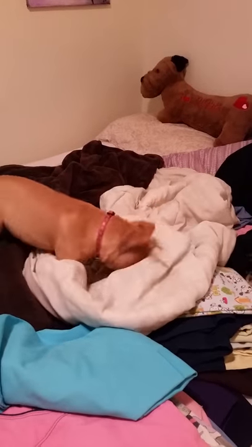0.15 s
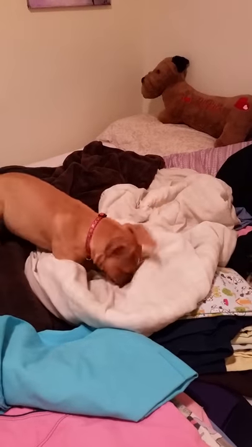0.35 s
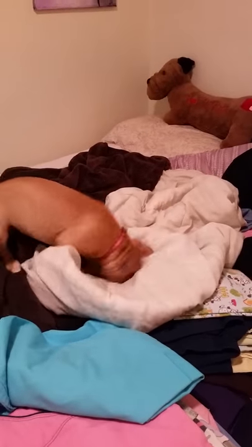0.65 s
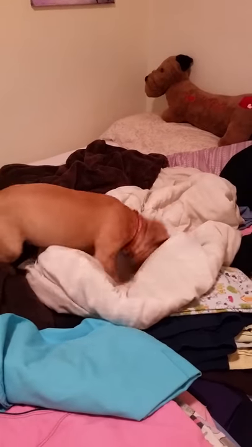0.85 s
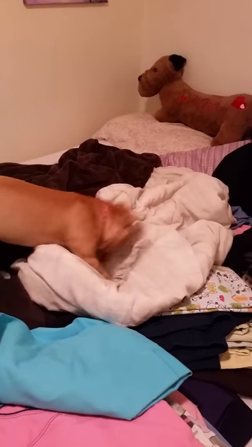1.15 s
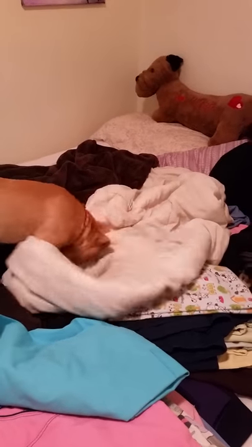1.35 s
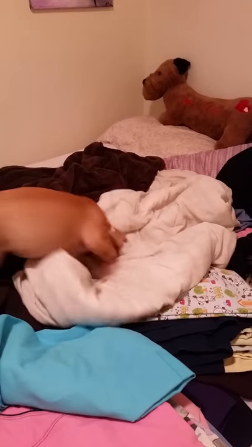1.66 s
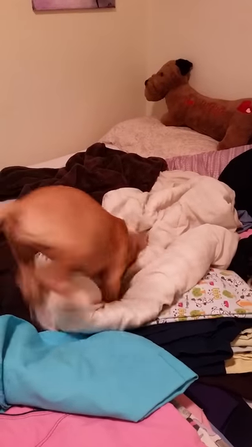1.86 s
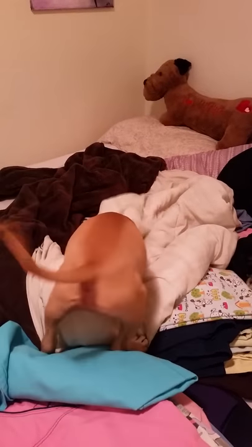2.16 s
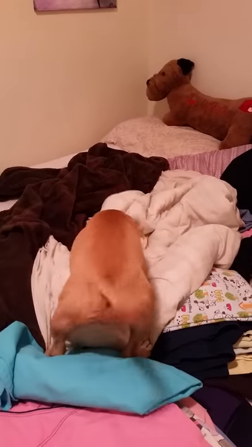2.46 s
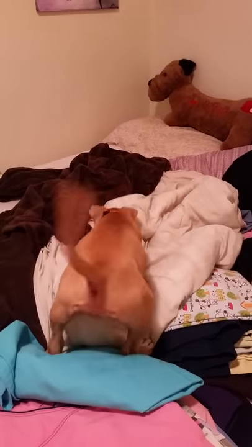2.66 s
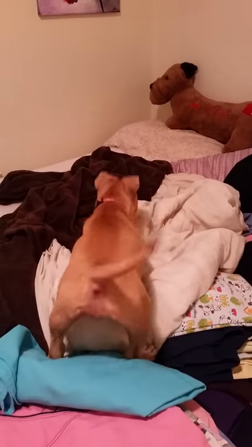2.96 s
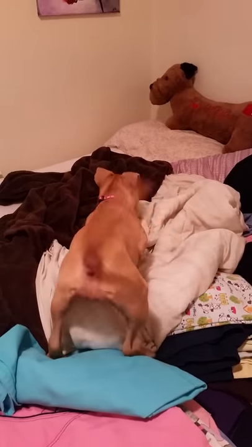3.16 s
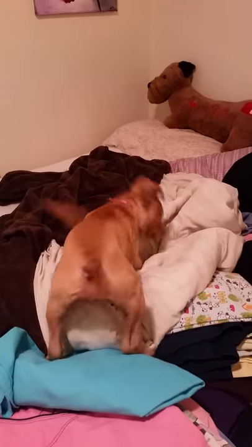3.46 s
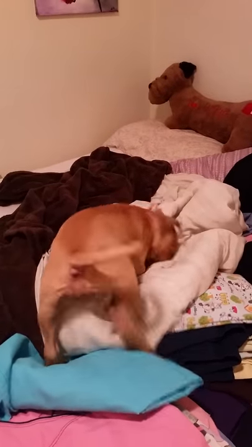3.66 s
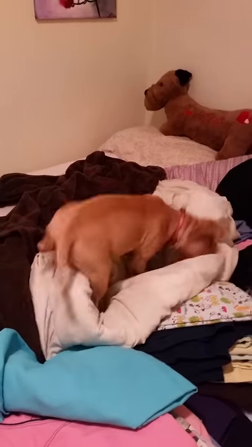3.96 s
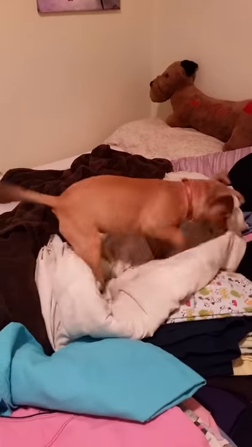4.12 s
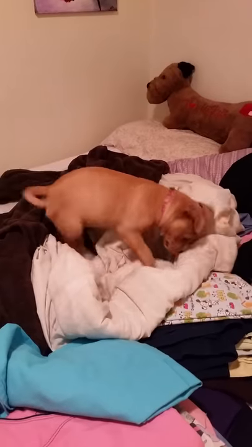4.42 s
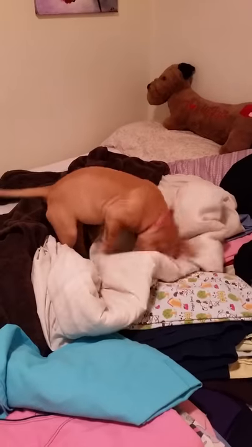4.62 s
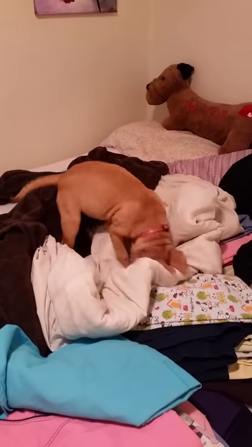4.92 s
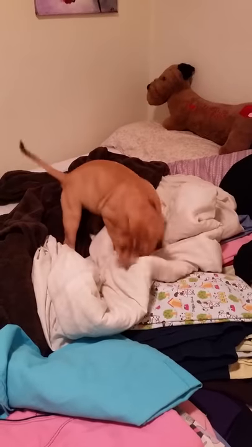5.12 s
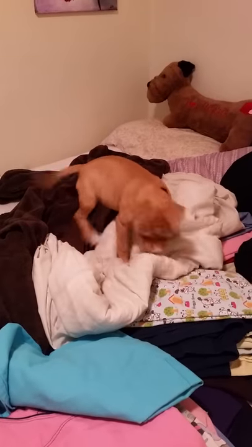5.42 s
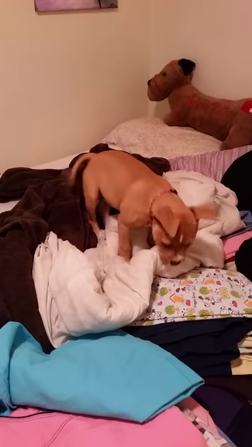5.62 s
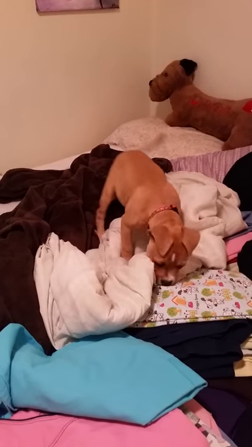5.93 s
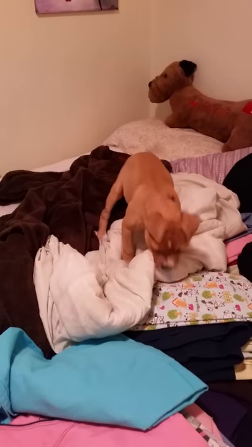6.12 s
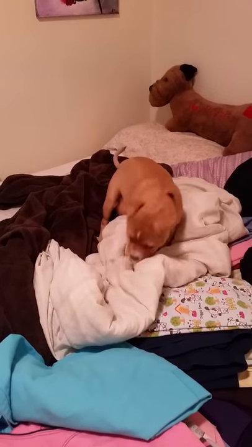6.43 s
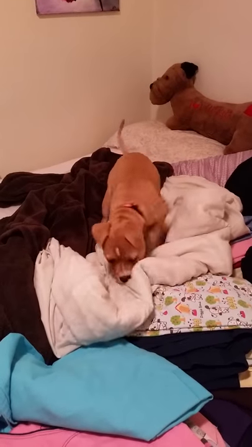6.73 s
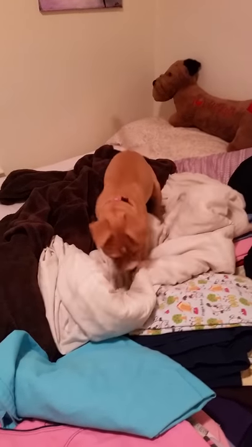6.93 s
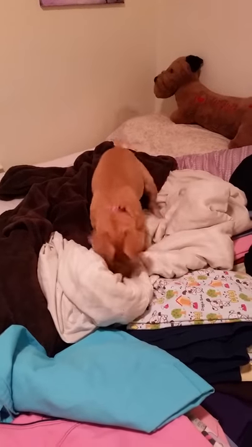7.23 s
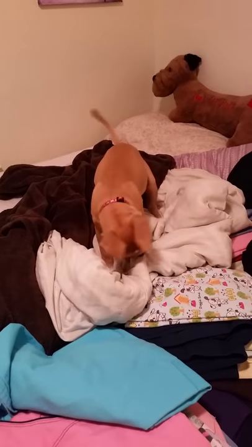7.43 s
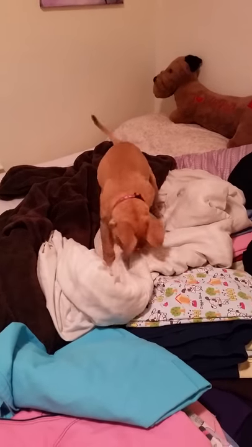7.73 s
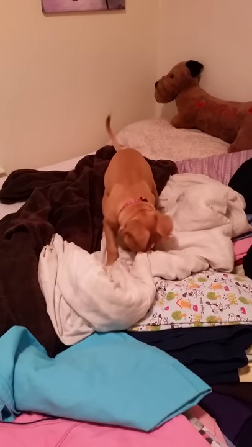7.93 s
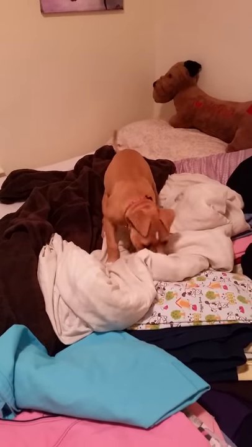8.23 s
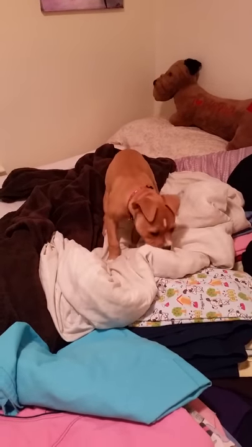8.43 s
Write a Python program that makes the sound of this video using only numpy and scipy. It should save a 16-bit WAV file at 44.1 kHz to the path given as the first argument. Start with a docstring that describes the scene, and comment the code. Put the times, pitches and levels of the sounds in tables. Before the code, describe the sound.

Soft dull cloth rustling and paw thuds on bedding, sparse metallic tag clinks and sharp clicks, over a steady low mains hum.

```python
"""Small bedroom: a small dog paws and noses its way into a heap of blankets on a bed.
Fabric swishes and folds (shaped noise, dying swings), paws pad on the mattress (swelling low sines).
Metal tags on the collar clink (struck decaying modes); claws tick and scratch (noise bursts).
Mains hum and a few low pops sit mostly in the left microphone, over room noise, hiss and a faint drone."""
import sys
import numpy as np
from scipy import signal
from scipy.fft import rfft, irfft, next_fast_len
from scipy.io import wavfile

SR = 44100
rng = np.random.default_rng(int(sys.argv[2]) if len(sys.argv) > 2 else 0)


def materialize(psi):
    """Save the field psi as 16-bit PCM at rate SR to the path in sys.argv[1].

    A 1-D psi becomes a single channel; in a 2-D psi each row is a channel.
    """
    bounded = np.clip(np.atleast_2d(psi).T, -1, 1)
    quanta = np.round(bounded * 32767).astype(np.int16)
    wavfile.write(sys.argv[1], SR, quanta)


N = 378359
TIME_S = np.arange(N) / SR

# coat brushing on the covers: time_s, level_db
BRUSHING = [(0, -68.5), (1.6, -68), (2.5, -67), (3.7, -68.5), (4.5, -67), (5.2, -68), (5.8, -67.5),
            (6.7, -73), (7.3, -67), (8, -73.5), (8.58, -74)]
# dull rustle of the heap, as effort: time_s, level_db
EFFORT = [(0, -48.5), (1.55, -47.5), (2, -53), (4.7, -54), (5.3, -58), (7.2, -63), (8.58, -86)]
# spectra of brushing and heap: freq_hz, gain_db
BRUSH_SPECTRUM = [(300, 0.5), (1200, 14.5), (2500, 7.5), (4500, 3), (7000, -6.5), (11000, -6.5),
                  (15000, -2.5)]
HEAP_SPECTRUM = [(30, 11), (80, 6), (150, 16), (330, 0), (450, -0.5), (750, -8), (1300, -17), (3000, -29.5),
                 (9000, -51)]

# spectra of room noise and microphone hiss: freq_hz, gain_db
ROOM_SPECTRUM = [(20, -2), (45, 4.5), (100, 0.5), (150, 0.5), (260, -6.5), (335, -7), (430, -13),
                 (900, -18), (1800, -30.5), (4500, -41.5), (14000, -82)]
HISS_SPECTRUM = [(300, 12.5), (2500, 2), (5000, -3.5), (7500, 4), (11000, -24), (15000, -15)]
ROOM_NOISE_DB, HISS_DB = -50.0, -73.5
DRONE_HZ, DRONE_DB, DRONE_T60_S = 328.4, -64, 0.24

# mains hum partials: multiple, level_db
HUM_PARTIALS = [(1, 1.5), (2, -17), (3, -8.5), (5, -22.5), (9, -35), (11, -50.5)]
MAINS_HZ = 60
HUM_DB, HUM_WAVER_DB = -30, 0.47
HUM_DROP_DB, HUM_DROP_S, HUM_DROP_WIDTH_S = 6, 4.24, 0.0089
HUM_DIP_DB, HUM_DIP_S, HUM_DIP_WIDTH_S = 2, 0.74, 0.088
LEFT_MIC_DB = [[-1], [-31]]  # left, right gain of hum and pops

# collar knocks: start_s, small_tag_db, large_tag_db, ring_db, clasp_db
KNOCKS = [(.029, -71, -55, -48.5, -66), (0.054, -66, -54, -56, -70), (0.091, -63, -62, -61, -80),
          (1.289, -66, -78, -82, -80), (1.382, -64.5, -76, -82, -80), (1.661, -68, -78, -72, -78),
          (1.723, -65, -61, -58, -53), (1.753, -69, -66, -51.5, -46.5), (1.811, -78, -65, -61, -75),
          (1.83, -51, -40, -44, -60), (1.845, -61, -46, -67, -70), (1.918, -63, -70, -70, -72),
          (2.164, -74, -63, -80, -72), (2.177, -74, -61.5, -78, -66), (2.226, -67, -63.5, -80, -72),
          (3.135, -75, -57.5, -55, -74), (3.597, -69, -42.5, -54, -62), (3.629, -67, -57, -64, -62),
          (3.703, -77, -73, -74, -76), (3.8, -65, -72, -70, -82), (3.848, -69, -79, -76, -78),
          (3.865, -67, -56, -48, -66), (3.88, -72, -65, -50.5, -74), (3.964, -68, -61, -68, -80),
          (4.645, -72, -65, -61, -80), (4.689, -75, -61, -68, -78), (4.98, -50, -58, -53, -72),
          (5.042, -59, -72, -66, -78), (5.117, -64, -80, -70, -80), (5.187, -55, -66, -59, -65),
          (5.243, -61, -63, -69, -71), (5.493, -59, -61, -47, -63), (5.784, -78, -65, -74, -80),
          (5.89, -80, -63.5, -62, -80), (5.989, -72, -74, -66, -76), (6.036, -68, -45.5, -55, -56),
          (6.093, -60, -60, -75, -72), (6.488, -68, -76, -84, -84), (6.504, -73, -78, -84, -84),
          (7.106, -62, -71, -66, -75), (7.128, -64, -69, -72, -78), (7.188, -71, -76, -80, -82),
          (7.377, -69, -72.5, -77, -77), (7.587, -62, -73, -73, -80)]
# modes of each metal part: pitch_hz, level_db, t60_s
SMALL_TAG = [(6170, -17, .1), (6965, -6.5, .12), (9925, -6.5, .13)]
LARGE_TAG = [(4360, -23, .09), (4680, -23, .08), (7010, -12.5, .13), (10185, -8, .12)]
RING = [(4400, -21, .08), (6990, -5.5, .13), (12930, -10.5, .07), (13030, -11, .07)]
CLASP = [(13760, -4, .08)]
CONTACT_DB, CONTACT_DECAY_S = -13.5, 0.016  # metal chatter, re hardest-hit part
REBOUND_S, REBOUND_DB = 0.012, -11  # mean wait; level re knock
TAG_SWING_DB = 3  # left-right spread
TINKLES_PER_S, TINKLE_DB, TINKLE_SPREAD_DB = 9.1, -80, 4.5  # level at mean of the brushing table

# claw scratches over the weave: start_s, level_db
SCRATCHES = [(0.053, -43), (.577, -57), (1.451, -52), (7.1035, -39), (7.126, -53)]
# scratch spectrum: freq_hz, gain_db
SCRATCH_SPECTRUM = [(1000, -20), (3000, 5), (4400, 11), (5400, -4.5), (7000, -8), (14000, -33)]

# dry ticks of claws and buckle, the one at 4.226 s the faint crack of the loudest pop: start_s, level_db
TICKS = [(0.131, -47.5), (.8825, -45), (1.83, -37), (2.072, -45.5), (3.133, -43), (3.597, -47),
         (4.226, -47.5), (4.76, -46), (4.98, -53), (5.968, -51), (6.035, -47)]

# paw and snout strokes along the fabric: peak_s, length_s, hiss_db, rasp_db, rub_db
STROKES = [(0.284, 0.096, -58, -63.5, -54), (0.446, 0.059, -73.5, -76, -64), (0.572, 0.046, -93, -70, -67),
           (0.735, 0.055, -79, -80, -57), (1.227, 0.084, -60.5, -75, -56), (1.474, 0.11, -70, -72, -59.5),
           (2.026, 0.098, -70.5, -80, -78), (2.838, 0.11, -65.5, -71, -59.5), (3, 0.12, -78, -72, -60),
           (3.068, 0.088, -81, -65.5, -62), (3.445, 0.11, -74, -70.5, -68), (4.149, 0.11, -61.5, -76, -68),
           (4.745, 0.27, -68, -73, -62.5), (5.354, 0.057, -46, -60, -55), (5.392, 0.038, -60.5, -56.5, -64),
           (6.272, 0.18, -68, -68, -61.5), (7.003, 0.07, -64, -74, -60), (7.061, 0.1, -62, -60, -67),
           (7.832, 0.1, -69, -82, -65)]
# spectra of sliding hiss, weave rasp, pressing rub: freq_hz, gain_db
SLIDE_SPECTRUM = [(300, 5), (1500, -5), (3000, -6.5), (5500, 1), (10000, 0), (11600, 1), (13000, 0),
                  (15000, -1.5)]
RASP_SPECTRUM = [(300, -25), (1200, 3), (2400, 1), (3500, 2), (5500, -6), (8000, -23), (15000, -36)]
DRAG_SPECTRUM = [(200, 14.5), (700, 19), (1300, 9), (2600, 0.5), (4500, -1.5), (7000, -29), (10000, -32),
                 (15000, -34)]
STROKE_RISE_SHARE, STROKE_FIRMNESS = 0.42, 2.56  # firmness 2 = bell curve, more = abrupter

# cover folds buckling: start_s, level_db, pitch_hz
FOLDS = [(.507, -41, 550), (0.523, -39, 550), (.559, -42, 700), (.577, -34.5, 750), (0.588, -36, 596),
         (.6, -43, 500), (.708, -36, 970), (1.595, -45, 560), (1.755, -39, 350), (1.772, -40.5, 650),
         (2.378, -43, 560), (2.42, -43.5, 660), (6.04, -39.5, 650), (6.966, -37, 677), (6.978, -41, 560)]
# delay scale and level of the grains re first flap; swings per 60 dB of decay
FOLD_SETTLE_S, FOLD_GRAIN_DB, FOLD_CYCLES = 0.0083, -15.5, 7.4

# paws pressing into the bedding: centre_s, level_db, pitch_hz
PAWS = [(.515, -47, 464), (.565, -45.5, 452), (.588, -45, 331), (1.009, -49, 318), (1.457, -52, 282),
        (1.525, -48.5, 367), (1.6, -53, 300), (1.765, -45, 318), (2.075, -49, 282), (2.426, -49, 297),
        (2.52, -48.5, 341), (2.565, -45, 228), (4.165, -50, 379), (4.568, -49.5, 338), (5.068, -44, 159.4),
        (5.245, -45, 163.8), (6.043, -52.5, 350), (6.975, -48.5, 319)]
# cover crinkle spectrum: freq_hz, gain_db
CRINKLE_SPECTRUM = [(120, 17), (350, 14), (800, -24), (1500, -21.5), (3000, -34), (6000, -37), (14000, -25)]
PUSH_CYCLES, CRINKLE_DB = 4.4, -6.5  # swell half length in swings; crinkle re thud

# low pops: start_s, level_db, push_s, start_softness, swing_hz, damping
POPS = [(0.6301, -18, 0.0042, 3, 52.5, 0.96), (3.9072, -9.5, 0.0052, 4.8, 42.5, 0.9),
        (4.029, -20, 0.0064, 2.8, 58.7, 0.73), (4.123, -26, 0.0039, 2.8, 52.5, 0.8),
        (4.158, -26, 0.0026, 3.4, 59.3, 1.2), (4.2275, -3, 0.00088, 1.34, 63.4, 1.59),
        (7.939, -16, 0.005, 3, 62, 1.4)]

SCUFF_S, SCUFF_LENGTH_S, SCUFF_DB, SCUFF_HZ = 7.604, 0.012, -40, 386

ROOM_T60_S = 0.56
# microphone port response: freq_hz, left_db, right_db
PORTS = [(110, -0.5, -2.5), (900, -3.5, -4.5), (2000, -4.5, -6), (2630, 0.5, -2), (3330, -9, -6),
         (5000, 1.5, 2), (6170, -6, 0.5), (7960, -14.5, -3), (8500, -12, -9), (9250, 1.5, -3.5),
         (10230, 12, 10.5), (11140, 12.5, 10.5), (11850, 16.5, 20), (13000, 8.5, 16.5), (15300, 6.5, -14)]
CUTOFF_HZ = 14650


def from_db(db):
    """Amplitude ratio of a level in dB."""
    return 10 ** (np.asarray(db) / 20)


def rms_one(x):
    """Scale to unit RMS."""
    return x / np.sqrt(np.mean(x ** 2) + 1e-20)


def butter_filter(x, order, hz, kind="low"):
    """Butterworth low or high pass."""
    return signal.sosfilt(signal.butter(order, hz, kind, fs=SR, output="sos"), x)


def colour(x, points):
    """Filter by a spectrum interpolated over log frequency."""
    hz, db = np.transpose(points)
    size = next_fast_len(N + 4096)
    log_hz = np.log(np.arange(size // 2 + 1) * SR / size + 1)
    gain = from_db(np.interp(log_hz, np.log(hz), db))
    return irfft(rfft(x, size) * gain, size)[..., :N]


def drift(rate_hz):
    """Random curve of unit RMS with rate_hz knots a second."""
    position = TIME_S * np.clip(rate_hz, 1, 2000)
    return rms_one(np.interp(position, np.arange(20000), rng.standard_normal(20000)))


def stereo_noise(alike):
    """White noise; share alike of its power is common to both sides."""
    share = np.clip(alike, 0, 1)
    common = np.sqrt(share) * rng.standard_normal(N)
    return common + np.sqrt(1 - share) * rng.standard_normal((2, N))


def strikes(times_s, db):
    """One click at each time."""
    out = np.zeros(N)
    out[np.clip(np.round(times_s * SR).astype(int), 0, N - 1)] = from_db(db)
    return out


def crack(clicks, decay_s):
    """Each click becomes a decaying burst of noise above 6.5 kHz."""
    envelope = signal.lfilter([1], [1, -np.exp(-1 / (decay_s * SR))], clicks + 1e-18)
    return butter_filter(envelope * stereo_noise(0), 2, 6500, "high")


def fabric(spectrum, catch_rate, catch_db, fold_rate, fold_db, alike):
    """Friction noise: threads catch and let go quickly, folds pass more slowly."""
    grip = from_db(catch_db * drift(catch_rate) + fold_db * drift(fold_rate))
    return rms_one(colour(stereo_noise(alike) * grip, spectrum))


def blankets():
    """Coat brushes lightly on the covers; the heap rustles dully with the dog's effort."""
    brush = fabric(BRUSH_SPECTRUM, catch_rate=700, catch_db=1.0, fold_rate=35, fold_db=1.3, alike=0.033)
    heap = fabric(HEAP_SPECTRUM, catch_rate=140, catch_db=1.0, fold_rate=22, fold_db=2.8, alike=0.5)
    brush_level = from_db(np.interp(TIME_S, *np.transpose(BRUSHING)))
    heap_level = from_db(np.interp(TIME_S, *np.transpose(EFFORT)))
    return brush_level * brush + heap_level * heap


def room_noise():
    """Quiet low-weighted noise, partly common to both sides."""
    return from_db(ROOM_NOISE_DB) * rms_one(colour(stereo_noise(0.23), ROOM_SPECTRUM))


def microphone_hiss():
    """Steady hiss, independent on each side."""
    return from_db(HISS_DB) * rms_one(colour(stereo_noise(0), HISS_SPECTRUM))


def drone():
    """Faint narrow drone: noise through a two-pole resonance."""
    radius, w = from_db(-60 / (DRONE_T60_S * SR)), 2 * np.pi * DRONE_HZ / SR
    poles = [1, -2 * radius * np.cos(w), radius * radius]
    return from_db(DRONE_DB) * rms_one(signal.lfilter([0, np.sin(w)], poles, stereo_noise(0.94) + 1e-18))


def hum():
    """Mostly odd mains harmonics; wavers, dips once, then halves at the loudest pop."""
    wave = sum(from_db(db) * np.sin(2 * np.pi * MAINS_HZ * multiple * TIME_S + np.pi / 4)
               for multiple, db in HUM_PARTIALS)
    drop = 0.5 + 0.5 * np.tanh((TIME_S - HUM_DROP_S) / HUM_DROP_WIDTH_S)
    dip = np.exp(-0.5 * ((TIME_S - HUM_DIP_S) / HUM_DIP_WIDTH_S) ** 2)
    level_db = HUM_DB - HUM_DROP_DB * drop - HUM_DIP_DB * dip + HUM_WAVER_DB * drift(15)
    return np.sqrt(2) * from_db(level_db) * wave * from_db(LEFT_MIC_DB)


def part_ring(modes, detune, damping_spread, flutter_db):
    """Decaying modes; contact with neighbour and fur varies each, swinging makes the ring flutter."""
    hz, db, t60_s = np.transpose(modes)[:, :, None]
    pitch, size, damping = rng.standard_normal((3, len(modes), 1))
    t = TIME_S[:SR // 5]
    knots_s = np.linspace(0, t[-1], 24)
    flutter = np.array([np.interp(t, knots_s, row) for row in rng.standard_normal((len(modes), 24))])
    decay_db = 60 * t / (t60_s * np.exp(damping_spread * damping))
    level = from_db(db + 1.5 * size + flutter_db * flutter - decay_db)
    return np.sum(level * np.sin(2 * np.pi * hz * (1 + detune * pitch) * t), axis=0)


def add_touch(out, start_s, db, modes):
    """Add one touch of a metal part, a little left or right as it turns."""
    start = int(start_s * SR)
    clink = part_ring(modes, detune=0.003, damping_spread=0.3, flutter_db=3.5)[:N - start]
    pan_db = TAG_SWING_DB * rng.standard_normal() * np.array([[0.5], [-0.5]])
    out[:, start:start + len(clink)] += from_db(db + pan_db) * clink


def collar():
    """Tags, ring and clasp knock and rebound twice, with a brief chatter of metal on metal."""
    knocks = np.array(KNOCKS)
    hardest_db = knocks[:, 1:].max(axis=1)
    out = crack(strikes(knocks[:, 0], hardest_db + CONTACT_DB), CONTACT_DECAY_S)
    for start_s, *parts_db in KNOCKS:
        for modes, db in zip((SMALL_TAG, LARGE_TAG, RING, CLASP), parts_db):
            add_touch(out, start_s, db, modes)
            for wait_s in np.cumsum(REBOUND_S * rng.uniform(0.4, 1.6, 2)):
                add_touch(out, start_s + wait_s, db + REBOUND_DB, modes)
    return out


def tinkles():
    """Faint touches of tags and ring at random times, firmer with the brushing level."""
    out = np.zeros((2, N))
    times_s, brushing_db = np.transpose(BRUSHING)
    for start_s in rng.uniform(0, TIME_S[-1], int(TINKLES_PER_S * TIME_S[-1])):
        motion_db = np.interp(start_s, times_s, brushing_db) - brushing_db.mean()
        db = TINKLE_DB + motion_db + TINKLE_SPREAD_DB * rng.standard_normal()
        add_touch(out, start_s, db, (SMALL_TAG, LARGE_TAG, RING)[rng.integers(3)])
    return out


def scratches():
    """A claw skips over the threads: short grainy noise bursts."""
    bursts = crack(strikes(*np.transpose(SCRATCHES)), decay_s=0.011)
    return colour(bursts * from_db(3.65 * drift(700)), SCRATCH_SPECTRUM)


def ticks():
    """Damped contacts: sub-millisecond noise bursts without ring."""
    return crack(strikes(*np.transpose(TICKS)), decay_s=0.00064)


def strokes():
    """Each stroke speeds up and slows: sliding hisses, the weave rasps, pressing rubs."""
    out = np.zeros((2, N))
    slide = fabric(SLIDE_SPECTRUM, catch_rate=900, catch_db=1.3, fold_rate=110, fold_db=1.6, alike=0.05)
    drag = fabric(DRAG_SPECTRUM, catch_rate=470, catch_db=2.8, fold_rate=50, fold_db=2.0, alike=0.4)
    rasp = fabric(RASP_SPECTRUM, catch_rate=900, catch_db=1.5, fold_rate=50, fold_db=1.0, alike=0.1)
    for peak_s, length_s, hiss_db, rasp_db, rub_db in STROKES:
        rise_s, fall_s = length_s * STROKE_RISE_SHARE, length_s * (1 - STROKE_RISE_SHARE)
        near = slice(max(0, int((peak_s - 4 * rise_s) * SR)), int((peak_s + 4 * fall_s) * SR))
        t = TIME_S[near] - peak_s
        speed = np.exp(-0.5 * abs(t / np.where(t < 0, rise_s, fall_s)) ** STROKE_FIRMNESS)
        friction = from_db(hiss_db) * slide[:, near] + from_db(rasp_db) * rasp[:, near]
        sound = speed * (friction + from_db(rub_db) * drag[:, near])
        # bounce off the dog's body, a new lag per stroke and side
        for side, lag_s in enumerate(rng.uniform(0.0002, 0.0009, 2)):
            bounce = from_db(-9) * np.roll(sound[side], int(lag_s * SR))
            out[side, near] += sound[side] + bounce
    return out * from_db([[-1.1], [1.1]])


def fold_grains(hz, count):
    """One flap and later small grains, each a few dying swings at its own pitch."""
    first = np.arange(count)[:, None] == 0
    wait, size, pitch, pan = rng.standard_normal((4, count, 1))
    delay_s = np.where(first, 0, FOLD_SETTLE_S * abs(wait))
    age_s = np.maximum(TIME_S[:SR // 10] - delay_s, 0)
    cycles = age_s * hz * np.where(first, 1, np.exp(0.6 * pitch))
    level_db = np.where(first, 0, FOLD_GRAIN_DB + 3 * size) - 60 * cycles / FOLD_CYCLES
    grains = from_db(level_db) * np.sin(2 * np.pi * cycles)
    return np.array([np.sum(grains * from_db(side * 3.5 * pan), axis=0) for side in (1, -1)])


def folds():
    """Cover folds buckle in dull, crackly scuffles of grains."""
    out = np.zeros((2, N))
    for start_s, db, hz in FOLDS:
        start, grains = int(start_s * SR), fold_grains(hz, count=15)
        out[:, start:start + grains.shape[1]] += from_db(db) * grains / abs(grains).max()
    return butter_filter(out, 1, 300, "high")


def paw_push(t, length_s, hz, sink, scatter):
    """Padding gives a few unsteady swings, sinking in pitch as the paw goes in."""
    knots = np.linspace(-4, 4, 21)
    wander, lump = (np.interp(t / length_s, knots, rng.standard_normal(len(knots))) for _ in range(2))
    phase = 2 * np.pi * np.cumsum(hz * np.exp(scatter * wander - sink * t / length_s)) / SR
    swell = np.exp(-0.5 * (t / length_s) ** 2) * from_db(2 * lump)
    return np.sqrt(2) * swell * np.sin(phase + 2 * np.pi * rng.random())


def paws():
    """Each push thuds softly, the deeper the longer; the cover crinkles while it moves."""
    out = np.zeros((2, N))
    crinkle = fabric(CRINKLE_SPECTRUM, catch_rate=600, catch_db=2, fold_rate=110, fold_db=3, alike=0.16)
    for centre_s, db, hz in PAWS:
        length_s = PUSH_CYCLES / hz
        near = abs(TIME_S - centre_s) < 4 * length_s
        thud = from_db(db) * paw_push(TIME_S[near] - centre_s, length_s, hz, sink=0.2, scatter=0.2995)
        out[:, near] += thud + from_db(CRINKLE_DB) * abs(thud) * crinkle[:, near]
    return out


def pops():
    """A short push, after which the microphone's bass cut swings back once or twice."""
    out = np.zeros(N)
    for start_s, db, push_s, softness, hz, damping in POPS:
        near = abs(TIME_S - start_s) < 0.1
        push = 1 - np.exp(-(np.maximum(TIME_S[near] - start_s, 0) / push_s) ** softness)
        w = 2 * np.pi * hz
        bass_cut = signal.bilinear([1, 0, 0], [1, damping * w, w * w], SR)
        swing = signal.lfilter(*bass_cut, signal.lfilter(*bass_cut, push))
        out[near] += from_db(db) * swing / abs(swing).max()
    return out * from_db(LEFT_MIC_DB)


def scuff():
    """Three pads of a skidding paw zip over the taut cover, pitch falling as the paw slows."""
    out = np.zeros(N)
    near = abs(TIME_S - SCUFF_S) < 3 * SCUFF_LENGTH_S
    pads = [paw_push(TIME_S[near] - SCUFF_S, SCUFF_LENGTH_S, SCUFF_HZ * ratio, sink=0.33, scatter=0.22)
            for ratio in (0.8, 1, 1.2)]
    out[near] = from_db(SCUFF_DB) * np.sum(pads, axis=0) / np.sqrt(len(pads))
    return butter_filter(out, 3, 750)


def bedroom(x, wet_db):
    """Short diffuse tail, different on each side; bedding soaks up its treble."""
    t = TIME_S[:SR // 2]
    tail = rng.standard_normal((2, len(t))) * from_db(-60 * t / ROOM_T60_S) * (t > 0.004)
    tail /= np.sqrt(np.sum(tail ** 2, axis=1, keepdims=True))
    tail = butter_filter(tail, 1, 6000)
    return x + from_db(wet_db) * signal.fftconvolve(x, tail, axes=1)[:, :N]


def scene():
    """The dog in its room, over room noise, hiss, drone and hum."""
    cloth = bedroom(blankets() + strokes() + folds() + paws(), wet_db=-3.5)
    metal = bedroom(collar() + tinkles() + ticks(), wet_db=-7)
    without_room = hum() + scratches() + pops() + scuff()
    return cloth + metal + without_room + room_noise() + microphone_hiss() + drone()


def record(dry):
    """Ports dip near 8 kHz and resonate near 12 kHz; the top is cut, the ends faded."""
    ports = np.array(PORTS)
    fade = np.clip(np.minimum(TIME_S, TIME_S[-1] - TIME_S) / 0.003, 0, 1)
    heard = np.array([colour(fade * dry[side], ports[:, [0, side + 1]]) for side in range(2)])
    return signal.sosfilt(signal.ellip(12, 0.1, 80, CUTOFF_HZ, fs=SR, output="sos"), heard)


dry = scene()
out = record(dry)
materialize(out)
```